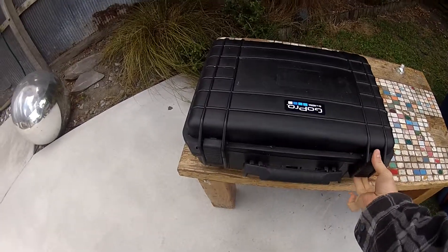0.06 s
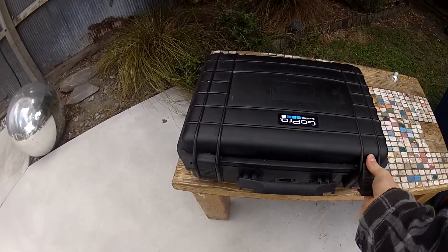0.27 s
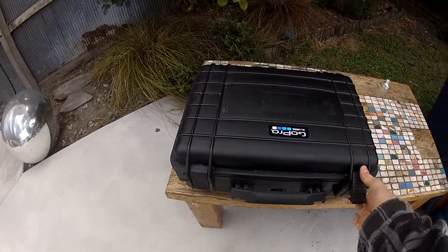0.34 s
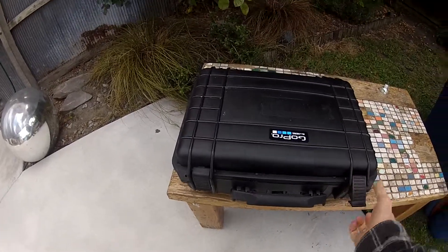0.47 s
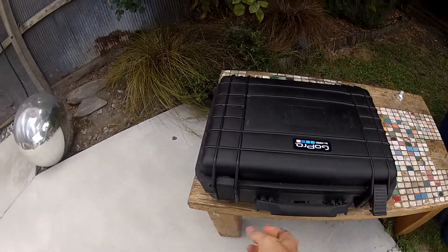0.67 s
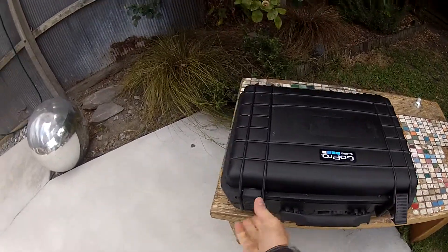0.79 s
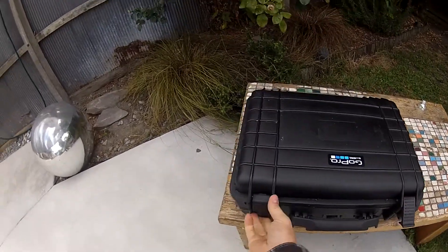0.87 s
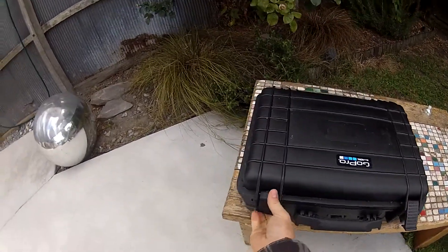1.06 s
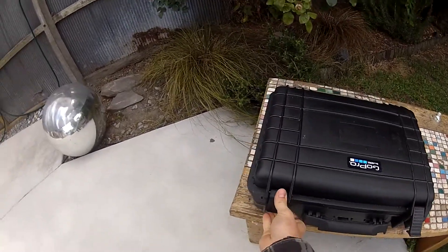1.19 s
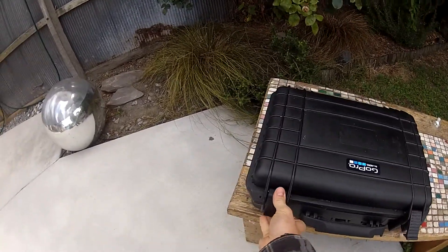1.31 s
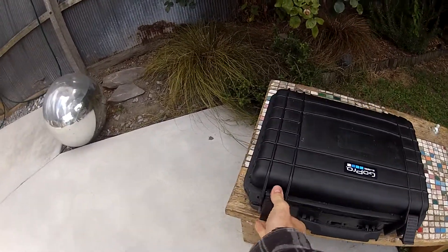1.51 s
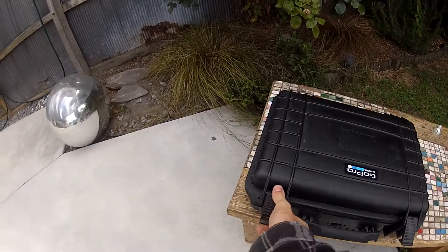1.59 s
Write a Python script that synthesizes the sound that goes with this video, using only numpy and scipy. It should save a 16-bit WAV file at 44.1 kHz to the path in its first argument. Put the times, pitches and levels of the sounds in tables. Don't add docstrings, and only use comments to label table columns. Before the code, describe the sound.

Plastic latches on a hard hollow case snap open twice, booming and rattling in outdoor quiet

```python
import sys
import numpy as np
from scipy import signal
from scipy.fft import rfft, irfft
from scipy.io import wavfile
from scipy.ndimage import uniform_filter1d

SR = 44100
rng = np.random.default_rng(int(sys.argv[2]) if len(sys.argv) > 2 else 0)


def transcribe(u):
    v = np.clip(np.atleast_2d(u).T, -1, 1)
    q = np.round(v * 32767).astype(np.int16)
    wavfile.write(sys.argv[1], SR, q)


def attenuation_scalar(level_db):
    decades = np.asarray(level_db, float) / 20
    return 10 ** decades


N = 72765

# pitch_hz, level_db (per Hz)
AIR_SPECTRUM = [(25, -8.5), (80, -4.5), (220, -6.5), (520, -1), (720, -7), (1000, -13.5), (3000, -16.5),
                (5900, -19)]
# pitch_hz, level_db (per Hz)
CHANNEL_HISS = [(20, -11), (1000, -7), (5500, -8.5), (6200, -12.5), (8000, -5), (9600, -5), (10200, -30)]
# start_s, length_s, level_db, from_hz, to_hz
HINGE_SQUEAKS = [
    (1.099, 0.019, -61, 3106, 3350),
    (1.117, 0.023, -61.5, 3080, 3135),
]
# start_s, length_s, level_db, fall_db (over its length), pitch_hz
LEVER_STROKES = [(.232, 0.0067, -35, 13, 3290), (.245, 0.09, -63, -3, 2295), (.281, 0.036, -55.5, 4, 3100),
                 (.395, 0.025, -61, -4.6, 2920), (.898, 0.023, -56, 6, 2700), (.92, .045, -62, 6, 2600),
                 (.990, .035, -65.5, 6, 1900), (1.138, .03, -60.5, -3.5, 1800),
                 (1.145, 0.03, -60.5, -4, 3120), (1.364, 0.014, -51, -12, 2400),
                 (1.379, 0.0096, -41, 13.5, 4600), (1.395, .085, -57.5, 14.5, 1900),
                 (1.400, 0.068, -57.5, 10, 3000), (1.390, .035, -56, -2.5, 4070),
                 (1.368, 0.039, -57, 0, 5200)]
# start_s, length_s, level_db, fall_db (over its length), pitch_hz
SHELL_STROKES = [
    (.246, 0.0725, -35, 6.5, 380),
    (.320, 0.099, -50.5, 17, 300),
    (.395, 0.042, -57.5, 1.5, 450),
    (.897, 0.089, -55, 26.5, 450),
    (1.135, 0.037, -61.5, -4, 610),
    (1.188, 0.0176, -48, 9, 560),
    (1.375, 0.0323, -36, 3, 420),
    (1.405, 0.076, -46.5, 17.5, 264),
    (1.638, 0.011, -51, -6, 450),
]
# start_s, level_db, pitch_hz (favoured), damping (1 = free)
LEVER_TICKS = [(0.2319, -30.5, 1400, 1.24), (0.2345, -21.5, 2720, 3), (0.2358, -24.5, 1979, 4.7),
               (0.2374, -29, 3900, 3.4), (0.2365, -29.5, 5000, 1.6), (0.241, -41, 2840, 4.3),
               (0.2567, -41, 2074, 3), (0.2684, -31, 4400, 3.8), (.2668, -36, 2582, 3.7),
               (0.2713, -46, 2556, 3), (0.2793, -35, 2050, 2.2), (0.28, -37, 4860, 1.3),
               (0.2818, -30, 3000, 3.3), (0.2919, -38, 2950, 2.2), (.291, -42, 1800, 2.8),
               (0.297, -35, 3050, 2.7), (.303, -49.5, 2700, 2.5), (0.9015, -53, 2240, 1.7),
               (1.093, -49, 2590, 1.5), (1.1845, -50.5, 1730, 1.9), (1.185, -44, 3160, 2.2),
               (1.331, -59, 2210, 3.4), (1.372, -41, 2400, 4), (1.372, -34, 3500, 2.9),
               (1.375, -44.5, 1950, 2.5), (1.3791, -31.5, 1810, 5.6), (1.3806, -22.5, 2200, 2.0),
               (1.3819, -27, 3110, 2.8), (1.383, -53, 5400, 1.5), (1.3844, -31.5, 3920, 0.97),
               (1.385, -35, 1850, 1.3), (1.391, -34.5, 2000, 3.2), (1.390, -44, 5200, 1.8),
               (1.396, -38, 2870, 1.5), (1.403, -46.5, 2074, 0.78), (1.414, -44, 3937, 1.5),
               (1.424, -48, 2026, 0.57), (1.425, -50, 2970, 1)]
# start_s, level_db, pitch_hz (favoured), contact_ms, damping (1 = free)
SHELL_KNOCKS = [(0.058, -23, 160, 3.75, 1.74), (0.062, -41, 171, 2.4, 1.9), (0.056, -20, 88, 3.6, 2.6),
                (0.233, 4, 354.5, 1.74, 2.8), (.234, -9.5, 910, 0.32, 1.3), (0.237, -3.5, 82, 5.4, 2),
                (0.2394, -20.5, 189, 1.2, 1.8), (0.24, -20.5, 276, 2.36, 1.6), (.418, -57, 614, 2.7, 1.6),
                (0.904, -41, 140, 1.8, 1.48), (1.167, -46, 144, 1, 0.97), (1.1852, -35, 490, 0.93, 1.76),
                (1.3295, -44, 636, .8, 1.9), (1.334, -36, 160, 3.6, 0.84), (1.3689, -10.5, 285, 2.31, 2.3),
                (1.371, 6.5, 81, 5.9, 3.8), (1.3696, -29, 163, 3.4, 0.95), (1.3759, -33, 333, 1.16, 3.7),
                (1.3861, -13.5, 235, 2.15, 1.96), (1.392, -26.5, 535, 0.81, 1.32),
                (1.403, -29, 293, 1.2, 3.1), (1.427, -32, 199, 2.7, 0.61), (1.452, -37, 195, 4.6, 0.67),
                (1.510, -41.5, 215, 1.9, 1.1), (1.5804, -31, 148, 3.4, 1.1), (1.6356, -34, 510, 1.12, 0.96),
                (1.6372, -16, 230, 2.1, 0.28), (1.186, -43, 686, 0.62, 0.99), (1.172, -29, 82, 3.5, 3.0),
                (0.299, -16, 90, 3.1, 3.0), (1.403, -38, 85, 4, 3.2)]
# pitch_hz, level_db, t60_s
LEVER_MODES = [(1325, -6, .05), (1580, -1, 0.06), (1740, 1.5, 0.06), (1933, 4, 0.041), (2082, -3.5, 0.036),
               (2340, -5.5, 0.066), (2700, -3, 0.018), (2839, 0.5, 0.062), (3020, -6.5, .03),
               (3590, -5.5, .025), (3939, -4, 0.04), (4550, -13.5, 0.025), (4970, -6.5, 0.025),
               (5620, 3.5, .02)]
# pitch_hz, level_db, t60_s
SHELL_MODES = [(90.6, -7, 1), (140, 5.5, .12), (166, 6.5, 0.32), (198.4, 6.5, 0.0833), (230, 3.5, 0.08),
               (268, 2.5, 0.09), (300, 2, 0.11), (352, 0.5, 0.044), (418.7, -1.5, 0.085), (488.8, -1, 0.16),
               (560, 0.5, 0.078), (655, -7, 0.047), (780, -26.5, 0.025), (873, -13, 0.056)]

AIR_DB, AIR_FLICKER_DB = -61, 1.37
HISS_DB, HISS_FLICKER_DB = -79, 3.5
SHELL_REACH_OCT, LEVER_REACH_OCT = 0.32, 0.3
TICK_MS, TICK_FOCUS_OCT = 0.15, 0.45
SCATTER_DB = 3.5
GRAINS_PER_S, GRAIN_SPREAD_DB, STROKE_FADE_S = 1800, 3, 0.0026
HOUSING_HZ, HOUSING_WIDTH_HZ, HOUSING_LEAK_DB = 404, 800, -23.5
BASS_CUT_HZ, LEVER_CUT_HZ = 42, 820
ALIAS_CUT_HZ, TOP_CUT_HZ = 5900, 15250
OVERLOAD_AT, JOLT_DB, JOLT_HZ, JOLT_T60_S = 0.16, -70, 60, 0.1


def ring(x, hz, t60):
    radius, angle = attenuation_scalar(-60 / (t60 * SR)), 2 * np.pi * hz / SR
    return signal.lfilter([0, np.sin(angle)], [1, -2 * radius * np.cos(angle), radius * radius], x + 1e-18)


def favour_db(hz, centre_hz, reach_oct):
    return -6 * (np.log2(hz / centre_hz) / reach_oct) ** 2


def cut_bass(x, order, hz):
    return signal.sosfilt(signal.butter(order, hz, "high", fs=SR, output="sos"), x)


def coloured(spectrum, flicker_db):
    out = np.zeros(N)
    edges = 20 * 2 ** np.arange(0, 9, 0.5)
    white = rng.standard_normal((2, N + SR // 2))
    points_hz, points_db = np.array(spectrum).T
    for k, (low, high) in enumerate(zip(edges, edges[1:])):
        band_filter = signal.butter(2, [low, high], "band", fs=SR, output="sos")
        band = signal.sosfilt(band_filter, white[k % 2])[-N:]
        flicker = np.interp(np.arange(N), np.linspace(0, N, 20), rng.standard_normal(20))
        level_db = np.interp(np.log(low * high) / 2, np.log(points_hz), points_db)
        out += band * attenuation_scalar(level_db + flicker_db * flicker)
    return out / np.std(out)


def air():
    return attenuation_scalar(AIR_DB) * coloured(AIR_SPECTRUM, AIR_FLICKER_DB)


def squeaks():
    t, out = np.arange(N) / SR, np.zeros(N)
    for start, length, db, from_hz, to_hz in HINGE_SQUEAKS:
        part = np.clip((t - start) / length, 0, 1)
        swell = np.sin(np.pi * part)
        wobble = uniform_filter1d(rng.standard_normal(N), size=60) * np.sqrt(60)
        phase = 2 * np.pi * np.cumsum(from_hz + (to_hz - from_hz) * part) / SR
        out += attenuation_scalar(db) * swell * attenuation_scalar(4.7 * wobble) * np.sin(phase)
    return out


def rubbing(strokes, modes, reach_oct, ringing):
    t, out = np.arange(N) / SR, np.zeros(N)
    shapes = []
    for start, length, db, fall, _ in strokes:
        slope = attenuation_scalar(db - fall * np.clip((t - start) / length, 0, 1))
        fade = np.clip(np.minimum(t - start, start + length - t) / STROKE_FADE_S, 0, 1)
        shapes.append(slope * fade)
    for hz, db, t60 in modes:
        stroke = sum(shape * attenuation_scalar(favour_db(hz, row[4], reach_oct)) for shape, row in zip(shapes, strokes))
        hits = rng.random(N) < GRAINS_PER_S / SR
        heights = attenuation_scalar(GRAIN_SPREAD_DB * np.minimum(rng.exponential(1, N), 3))
        grains = hits * heights * rng.choice([-1, 1], N)
        unit = np.std(ring(grains, hz, t60 * ringing))
        out += attenuation_scalar(db - 4) * ring(grains * stroke, hz, t60 * ringing) / unit
    return out


def strike(modes, reach_oct, start, db, centre_hz, contact_ms, damping, focus_oct=None):
    first = int(start * SR)
    t = np.arange(min(N - first, int(0.3 * SR))) / SR
    push = np.sin(np.pi * np.clip(t / (contact_ms / 1000), 0, 1))
    push = -push / push.sum()
    if focus_oct:
        focus_band = [centre_hz / 2 ** focus_oct, centre_hz * 2 ** focus_oct]
        push = signal.lfilter(*signal.butter(1, focus_band, "band", fs=SR), push)
    out = np.zeros(N)
    for hz, mode_db, t60 in modes:
        favour = favour_db(hz, centre_hz, reach_oct * min(damping, 1))
        weight = attenuation_scalar(db - 7 + mode_db + SCATTER_DB * rng.standard_normal() + favour)
        out[first:first + len(push)] += weight * ring(push, hz, t60 / damping)
    return out


def lever():
    return sum(strike(LEVER_MODES, LEVER_REACH_OCT, start, db, hz, TICK_MS, damping, TICK_FOCUS_OCT)
               for start, db, hz, damping in LEVER_TICKS)


def shell():
    return sum(strike(SHELL_MODES, SHELL_REACH_OCT, *knock) for knock in SHELL_KNOCKS)


def housing(x):
    radius, angle = np.exp(-np.pi * HOUSING_WIDTH_HZ / SR), 2 * np.pi * HOUSING_HZ / SR
    gain = (1 - radius * radius) / 2
    boxy = signal.lfilter([gain, 0, -gain], [1, -2 * radius * np.cos(angle), radius * radius], x)
    return boxy + attenuation_scalar(HOUSING_LEAK_DB) * x


def scene():
    hush = air()
    latch = squeaks() + rubbing(LEVER_STROKES, LEVER_MODES, reach_oct=0.23, ringing=0.2) + lever()
    latch = cut_bass(latch, 2, LEVER_CUT_HZ)
    shell_rubs = rubbing(SHELL_STROKES, SHELL_MODES[1:], reach_oct=1.0, ringing=0.28)
    body = housing(housing(shell()) + shell_rubs)
    case = cut_bass(body + latch, 3, BASS_CUT_HZ)
    return np.tile(case + hush, (2, 1))


def top_cut(x):
    return signal.sosfilt(signal.butter(12, 16530, fs=SR, output="sos"), x)


def record(dry):
    x = signal.sosfiltfilt(signal.butter(4, ALIAS_CUT_HZ, fs=SR, output="sos"), dry)
    steps = np.repeat(signal.resample_poly(x, 40, 147, axis=1), 4, axis=1)
    x = signal.resample_poly(steps, 147, 160, axis=1)[:, :N]
    overload = np.maximum(np.abs(dry[0]) - OVERLOAD_AT, 0)
    jolt = attenuation_scalar(JOLT_DB) * ring(overload, JOLT_HZ, JOLT_T60_S)
    hiss = attenuation_scalar(HISS_DB) * coloured(CHANNEL_HISS, HISS_FLICKER_DB)
    x = x + (jolt + hiss) * np.array([[1], [-1]])
    x = irfft(rfft(x) * (np.fft.rfftfreq(N, 1 / SR) < TOP_CUT_HZ), N)
    return top_cut(x)


dry = scene()
out = record(dry)
transcribe(out)
```